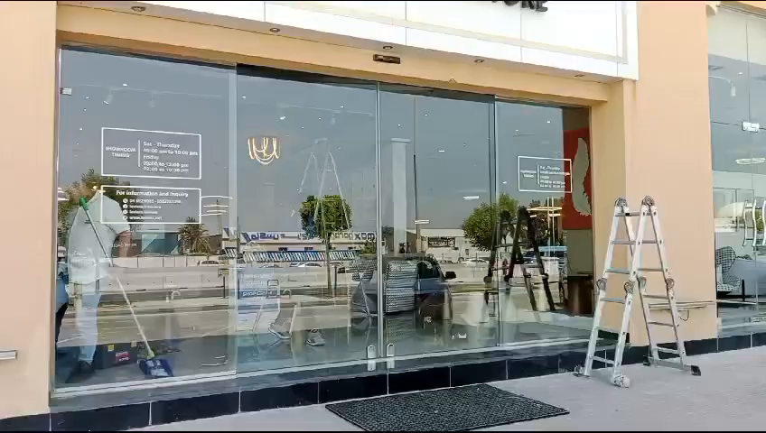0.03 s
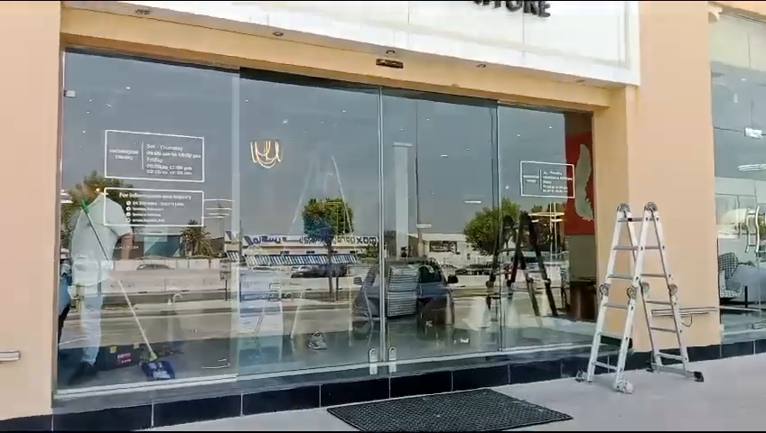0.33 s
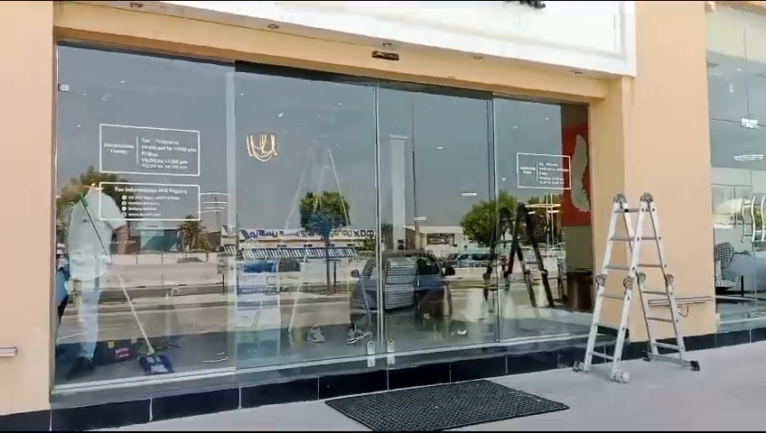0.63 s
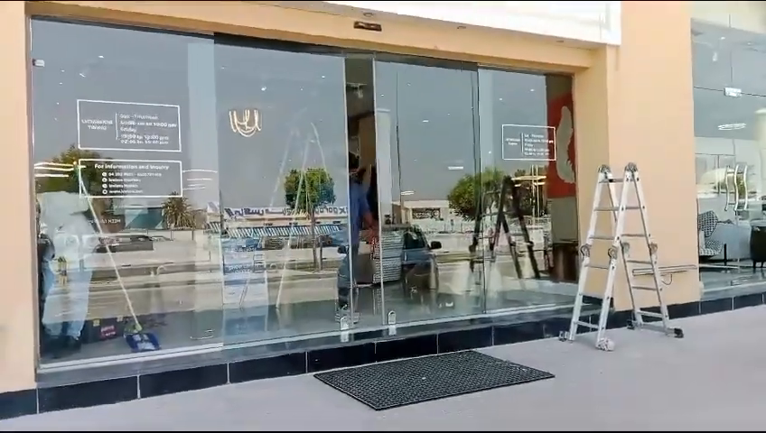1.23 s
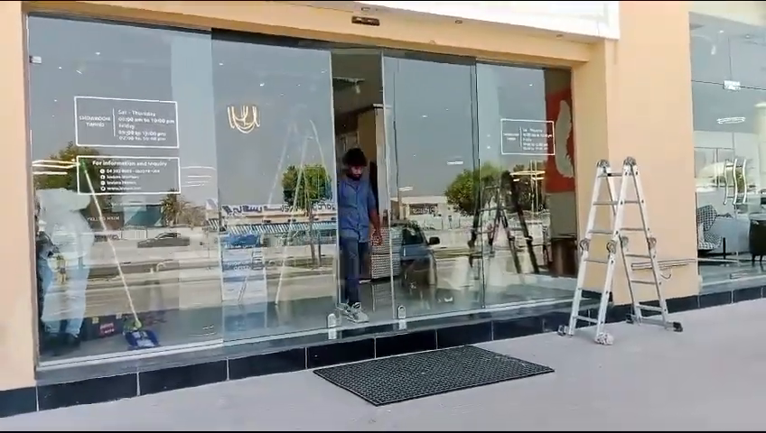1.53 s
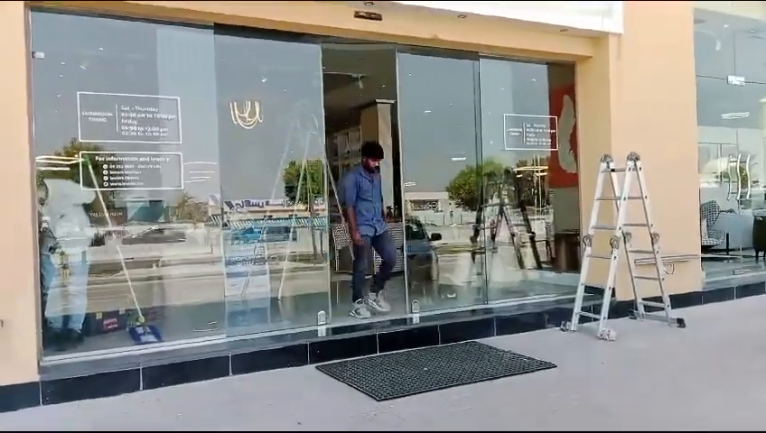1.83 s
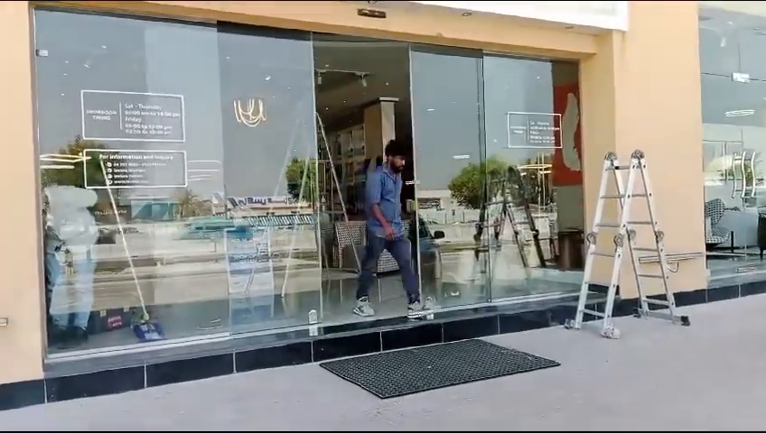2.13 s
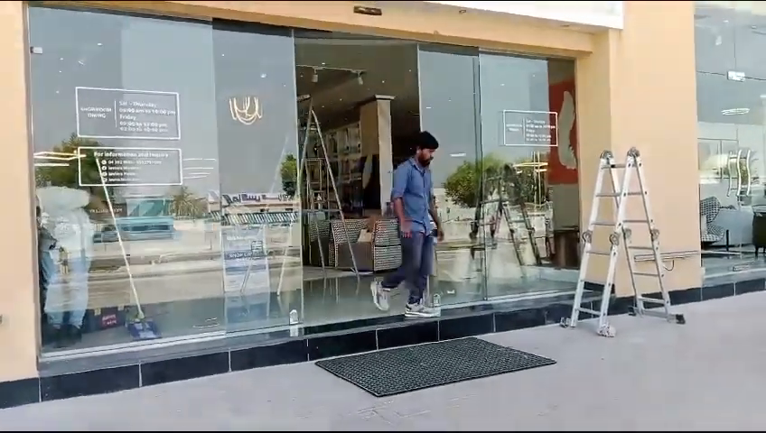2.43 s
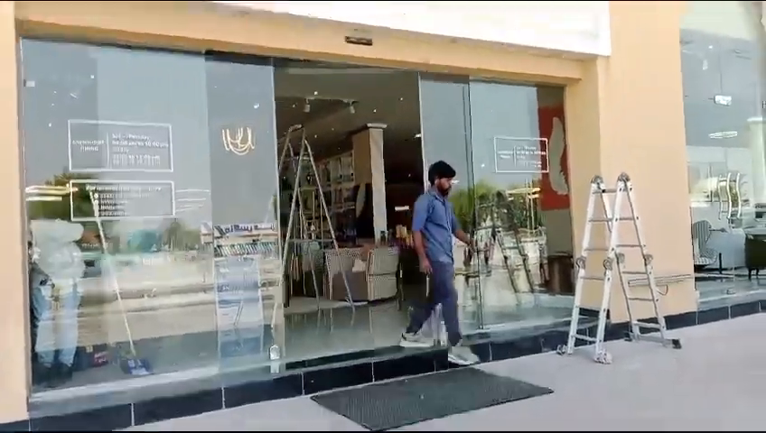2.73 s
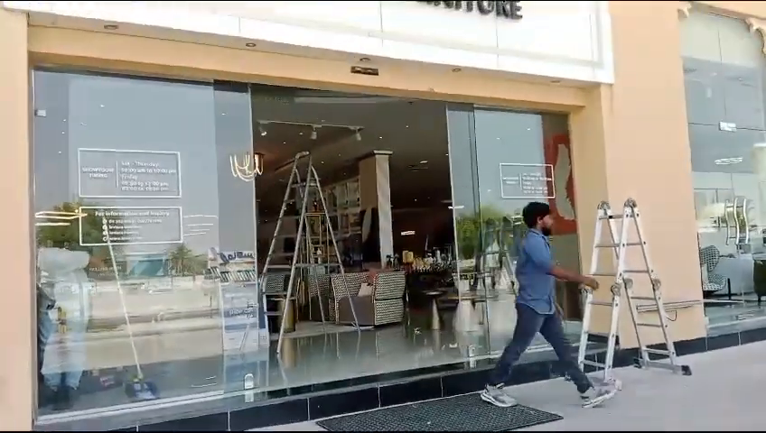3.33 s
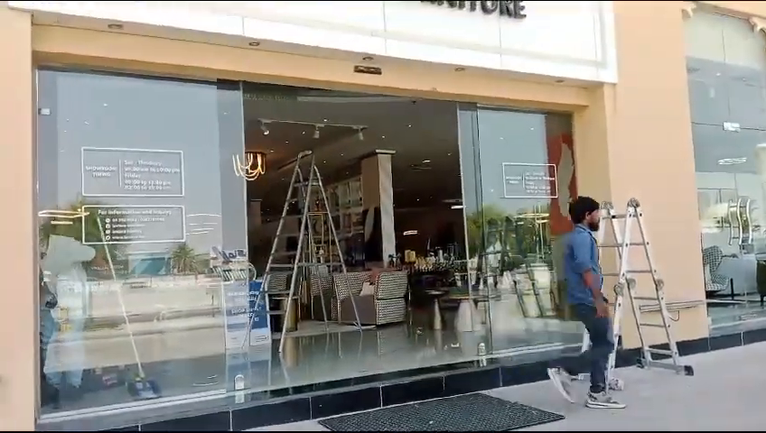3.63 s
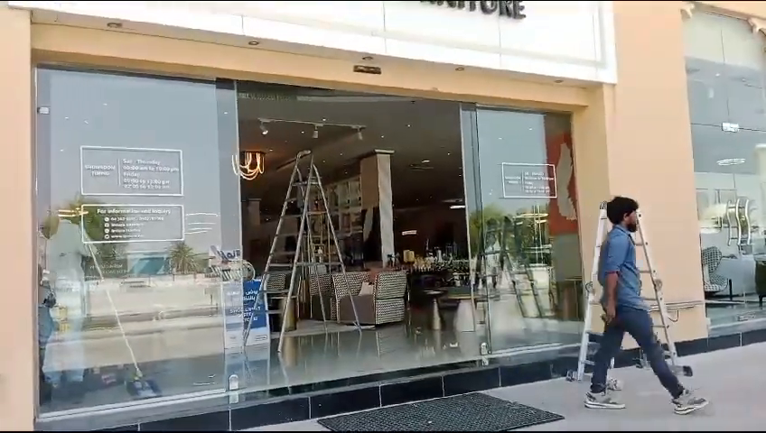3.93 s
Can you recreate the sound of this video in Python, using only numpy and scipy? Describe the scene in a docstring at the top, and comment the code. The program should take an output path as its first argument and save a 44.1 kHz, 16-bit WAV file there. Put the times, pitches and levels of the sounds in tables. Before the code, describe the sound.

Steady road traffic rumbles outdoors, with a faint shoe scuff and two light steps.

```python
"""Road traffic fades in just after the start, heard on one microphone at a shop front.
Tyres roar on the road, engines rumble and a heavy vehicle drones past on two low tones.
A man walks out of the door and scuffs a shoe on the step: the sole hisses, rasps and squeaks,
and the entrance gives the scuff a short tail. Two light steps follow on the paving."""
import sys
import numpy as np
from scipy import signal
from scipy.fft import rfft, irfft, next_fast_len
from scipy.io import wavfile
from scipy.ndimage import uniform_filter1d, map_coordinates

SR = 44100
rng = np.random.default_rng(int(sys.argv[2]) if len(sys.argv) > 2 else 0)


def generate_wav(signal):
    """Clip the signal to [-1, 1] and save it as 16-bit WAV at the path in sys.argv[1]."""
    frames = np.transpose(np.atleast_2d(signal))
    scaled = np.clip(frames, -1, 1) * 32767
    pcm = np.round(scaled).astype(np.int16)
    wavfile.write(sys.argv[1], SR, pcm)


N = 176400
T = np.arange(N) / SR

# tyre roar from the road (time [s], level [dB])
TYRE_LEVEL = [(0.32, -36), (0.48, -34.5), (0.58, -36), (0.85, -34.5), (1.1, -33.5), (1.35, -34), (1.9, -35),
              (2.3, -35.5), (2.5, -35.5), (2.85, -36), (3.18, -36.5), (3.7, -35), (3.97, -34)]
# faint high hiss of the street (time [s], level [dB])
HISS_LEVEL = [(0.3, -77.5), (0.52, -78), (0.65, -79), (1.5, -79), (1.9, -75), (2.15, -78.5), (2.4, -73),
              (2.7, -75), (3.15, -73), (3.5, -76.5), (4.0, -77.5)]
# deep exhaust noise (time [s], level [dB])
EXHAUST_LEVEL = [(0.3, -46), (0.55, -46.5), (0.72, -43), (1.0, -42), (1.35, -47.5), (2.05, -46),
                 (2.25, -40.5), (2.6, -43), (2.7, -61), (3.15, -55), (3.35, -43.5), (3.68, -39), (4.0, -47)]
# engine rumble (time [s], level [dB])
RUMBLE_LEVEL = [(0.32, -34.5), (0.45, -45.5), (0.6, -34), (0.72, -44.5), (0.86, -37.5), (0.94, -33.5),
                (1.5, -34), (1.9, -35.5), (2.15, -37), (2.58, -34), (2.85, -36.5), (3.0, -37), (3.1, -46),
                (3.22, -37), (3.42, -36.5), (3.55, -37), (3.66, -34), (3.8, -35.5), (3.9, -30.5)]
# lower midrange of the traffic (time [s], level [dB])
LOW_MID_LEVEL = [(0.3, -41), (0.52, -37.5), (0.595, -53), (0.66, -37.5), (0.88, -39), (0.95, -40),
                 (1.15, -36), (1.45, -39), (1.7, -37.5), (1.78, -49), (1.86, -37), (2.08, -38),
                 (2.24, -33.5), (2.38, -39.5), (2.82, -38), (2.93, -55), (3.03, -39), (3.2, -37),
                 (3.47, -40.5), (3.9, -37)]
# spectra of those five layers at the shop front (frequency [Hz], relative level [dB])
TYRE_SPECTRUM = [(200, -17), (450, -15), (620, -8), (750, -6), (880, 0), (1080, 0), (1300, -3), (1500, -6),
                 (2000, -8), (2600, -14), (3100, -26.5), (3600, -36), (4200, -46.5), (4700, -60),
                 (6000, -95.5)]
HISS_SPECTRUM = [(3000, -28.5), (4800, -23.5), (5500, -10), (6300, -6), (7000, -1.5), (7900, -4),
                 (8600, -12.5), (9300, -23.5), (10300, -13), (11300, -23.5), (13000, -25), (15000, -33)]
EXHAUST_SPECTRUM = [(10, -20.5), (36, -28.5), (50, -19), (63, 0.5), (85, 6.5), (115, -7.5), (200, -21.5),
                    (800, -80.5)]
RUMBLE_SPECTRUM = [(70, -30), (100, -1), (140, 2), (220, 0), (270, -7), (340, -14), (500, -27),
                   (1500, -77.5)]
LOW_MID_SPECTRUM = [(150, -25.5), (240, -1), (320, 1.5), (400, -2), (520, -5), (650, -13.5), (1000, -30.5),
                    (2500, -77)]
# exhaust tone of the heavy vehicle (time [s], pitch [Hz], level [dB])
EXHAUST_TONE = [(0.45, 107, -52), (0.7, 108.7, -37), (0.81, 108.4, -36.5), (0.85, 108.6, -32),
                (1.16, 108.5, -29.5), (1.205, 106.1, -37), (1.32, 109.3, -27.5), (1.385, 108.9, -43),
                (1.46, 108.5, -30), (1.62, 108.6, -35.5), (1.73, 108.5, -34), (2.05, 110.2, -36.5),
                (2.13, 110.1, -53.5), (2.47, 110.3, -47), (2.55, 109.5, -35), (2.63, 112, -36.5),
                (2.74, 113.4, -63), (3.3, 110.5, -54), (3.52, 109.9, -39), (3.9, 113.1, -45.5),
                (4.0, 116, -52)]
# its higher drone (time [s], pitch [Hz], level [dB])
DRONE_TONE = [(0.7, 254, -49), (0.95, 251, -38), (1.13, 249.5, -29.5), (1.28, 249.7, -48), (1.34, 247, -35),
              (1.5, 242, -36.5), (1.73, 243, -38.5), (1.8, 244, -53), (1.87, 243.6, -33.5),
              (2.15, 246.3, -38), (2.49, 247.4, -40), (2.62, 247.6, -37.5), (2.82, 248.8, -38.5),
              (2.97, 249, -56.5), (3.45, 248, -47.5), (3.63, 248, -36), (3.78, 250, -46), (4.0, 253.3, -29)]
# spectra of the sliding sole, its rasp and a footstep (frequency [Hz], relative level [dB])
SLIDE_SPECTRUM = [(4800, -33), (5700, -17), (6150, 0), (7100, 1), (8000, -6), (8800, -19), (9400, -29),
                  (10400, -30.5), (15000, -44)]
RASP_SPECTRUM = [(1200, -25), (2400, -4.5), (3100, 3), (3750, -3.5), (4100, -20.5), (4700, -42.5)]
STEP_SPECTRUM = [(3000, -10), (4800, -23), (7000, -1), (10500, -3), (15000, -7)]
# squeaks of the gripping sole (pitch [Hz], level [dB])
SQUEAKS = [(4470, -63.5), (5230, -72)]
# light steps on the paving (time [s], level [dB])
STEPS = [(3.345, -75), (3.895, -77.5)]
# thin whistles over the traffic (middle time [s], length [s], pitch [Hz], level [dB])
WHISTLES = [(0.533, 0.11, 6770, -74), (0.863, 0.16, 3140, -62.5), (1.304, 0.074, 3450, -64),
            (1.33, 0.053, 3110, -57), (2.057, 0.12, 3350, -65)]
# dip in the midrange of the traffic (time [s], depth [dB])
HOLLOW_DEPTH = [(0.3, 1), (2.5, 0.5), (2.9, 7), (3.55, 4.5), (3.75, 2), (4.0, 8.5)]
# flicker of the treble (frequency [Hz], depth [dB])
FLICKER_DEPTH = [(1500, 0), (2400, 1.8), (3300, 3.5), (4500, 3.3), (7000, 2)]
# fade-in on the microphone channel (time [s], gain [dB])
FADE_IN = [(0.13, -82), (0.155, -58), (0.17, -32), (0.228, -29), (0.252, -9), (0.295, -3), (0.32, 0.5)]


def tyres():
    """Tread noise of many cars out on the road, strongest near 1 kHz, with a thin hiss above."""
    roar = amp(curves(TYRE_LEVEL)[0] + 0.45 * wobble(16)) * rush(TYRE_SPECTRUM, 0.5, streaky_db=1.62)
    hiss = amp(curves(HISS_LEVEL)[0] + 0.88 * wobble(35)) * rush(HISS_SPECTRUM, 0.9, streaky_db=2.2)
    return roar + hiss


def engines():
    """Engines blend into one rumble at the shop front, from deep exhaust up to the lower midrange."""
    exhaust = amp(curves(EXHAUST_LEVEL)[0]) * rush(EXHAUST_SPECTRUM, patchy_db=1.5)
    rumble = amp(curves(RUMBLE_LEVEL)[0]) * rush(RUMBLE_SPECTRUM, patchy_db=0.9)
    low_mid = amp(curves(LOW_MID_LEVEL)[0]) * rush(LOW_MID_SPECTRUM, patchy_db=1.2, streaky_db=1.5)
    return exhaust + rumble + low_mid


def heavy_vehicle():
    """The exhaust tone and higher drone of a passing heavy vehicle stand out of the rumble."""
    exhaust = road_tone(EXHAUST_TONE, waver_hz=0.9, flutter_db=1)
    drone = road_tone(DRONE_TONE, waver_hz=1.6, flutter_db=1.2)
    return exhaust + drone


def shoe_scuff(start_s=2.712, rasp_lag_s=0.04, grip_s=2.855, rise_hz_per_s=2000):
    """On the doorstep a sole hisses over grit, rasps as weight comes on and squeaks as it grips."""
    hiss = sole_stroke(start_s, release_s=0.099) * amp(-59) * rush(SLIDE_SPECTRUM, patchy_db=-1.0)
    weight = sole_stroke(start_s + rasp_lag_s, release_s=0.076)
    rasp = weight * amp(-46.5) * rush(RASP_SPECTRUM, patchy_db=3.6)
    glide_hz = rise_hz_per_s * (T - grip_s)
    squeak = swell(grip_s, length_s=0.09) * sum(amp(db) * thin_tone(hz + glide_hz) for hz, db in SQUEAKS)
    return hiss + rasp + squeak + entrance_tail(hiss)


def sole_stroke(start_s, release_s, attack_s=0.056, hold_s=0.06, grit_db=0.5):
    """Envelope of a sliding sole, roughened by grit."""
    rise = np.clip((T - start_s) / attack_s, 0, 1)
    fall = np.exp(-np.maximum(T - start_s - attack_s - hold_s, 0) / release_s)
    return rise * fall * unit(amp(grit_db * wobble(300)))


def entrance_tail(x, t60_s=1, level_db=-9):
    """Reflections in the shop entrance prolong a sound."""
    tail = rng.standard_normal(SR) * amp(-60 * T[:SR] / t60_s)
    return amp(level_db) * signal.fftconvolve(x, tail / np.linalg.norm(tail))[:N]


def footsteps(attack_s=0.008, decay_s=0.016):
    """Each contact of a sole with the paving gives a brief gritty puff."""
    envelope = np.zeros(N)
    for start_s, db in STEPS:
        rise = np.clip((T - start_s) / attack_s, 0, 1)
        fall = np.exp(-np.maximum(T - start_s - attack_s, 0) / decay_s)
        envelope += amp(db) * rise * fall
    return envelope * rush(STEP_SPECTRUM, patchy_db=3.0)


def distant_whistles():
    """Short wavering whistles swell and fade, far from the microphone."""
    return sum(amp(db) * swell(s, length) * thin_tone(hz) for s, length, hz, db in WHISTLES)


def midrange_hollow(x, centre_hz=681, half_width_hz=95):
    """A narrow part of the midrange thins out towards the end."""
    band = filtered(x, lambda hz: 1 / (1 + ((hz - centre_hz) / half_width_hz) ** 4))
    return x - band * (1 - amp(-curves(HOLLOW_DEPTH)[0]))


def treble_flicker(x):
    """Small patches of the treble swell and fade at random."""
    hz, _, spectrogram = signal.stft(x, SR, nperseg=1024)
    depth_db = np.interp(hz, *np.transpose(FLICKER_DEPTH))[:, None]
    gain = amp(depth_db * mottle(spectrogram.shape, bins=3, frames=5))
    gain /= np.sqrt(np.mean(gain ** 2, axis=1, keepdims=True))  # each band keeps its mean power
    return signal.istft(spectrogram * gain, nperseg=1024)[1][:N]


def road_tone(rows, waver_hz, flutter_db):
    """A low tone whose pitch and level waver on the way from the road to the microphone."""
    hz, db = curves(rows)
    phase = 2 * np.pi * np.cumsum(hz + waver_hz * wobble(18)) / SR
    return np.sqrt(2) * np.sin(phase) * amp(db + flutter_db * wobble(15))


def thin_tone(hz, waver_hz=49.7):
    """A sine with an unsteady pitch."""
    return np.sin(2 * np.pi * np.cumsum(hz + waver_hz * wobble(200)) / SR)


def rush(spectrum, patchy_db, streaky_db=0):
    """Coloured noise of rms 1 with broad patches and narrow streaks of random gain."""
    white = signal.stft(rng.standard_normal(N), nperseg=2048)[2]
    patches = patchy_db * mottle(white.shape, bins=12, frames=4)
    streaks = streaky_db * mottle(white.shape, bins=2, frames=12)
    noise = signal.istft(white * amp(patches + streaks), nperseg=2048)[1][:N]
    knots_hz, db = np.transpose(spectrum)
    return unit(filtered(noise, lambda hz: amp(np.interp(np.log(hz + 1), np.log(knots_hz + 1), db))))


def mottle(shape, bins, frames):
    """A random field of rms 1, smoothed over frequency and time."""
    field = uniform_filter1d(rng.standard_normal(shape), size=bins, axis=0)
    return unit(uniform_filter1d(field, size=frames, axis=1))


def swell(middle_s, length_s):
    """A soft rise and fall."""
    return np.cos(np.pi * np.clip((T - middle_s) / length_s, -0.5, 0.5))


def wobble(rate):
    """A smooth random curve, rate knots a second."""
    return map_coordinates(rng.standard_normal(8192), [T * rate + 2], mode="wrap")


def filtered(x, response):
    """Shape x by a gain that depends on frequency."""
    size = next_fast_len(N + SR // 2)
    return irfft(rfft(x, size) * response(np.fft.rfftfreq(size, 1 / SR)), size)[:N]


def curves(rows):
    """One value per sample for each column after the time."""
    times, *columns = np.transpose(rows)
    return [np.interp(T, times, column) for column in columns]


def amp(db):
    """Decibels to gain."""
    return 10 ** (np.asarray(db) / 20)


def unit(x):
    """Scale to rms 1."""
    return x / np.sqrt(np.mean(x ** 2) + 1e-20)


def scene():
    """The road and the doorstep, heard in mono from the shop front."""
    traffic = midrange_hollow(tyres() + engines())
    street = treble_flicker(traffic + shoe_scuff())
    return (street + heavy_vehicle() + distant_whistles() + footsteps())[None]


def record(dry):
    """The microphone channel fades in and keeps nothing above the band limit."""
    band_limit_hz = 15100
    faded = dry[0] * amp(curves(FADE_IN)[0])
    return filtered(faded, lambda hz: hz < band_limit_hz)[None]


dry = scene()
out = record(dry)
generate_wav(out)
```